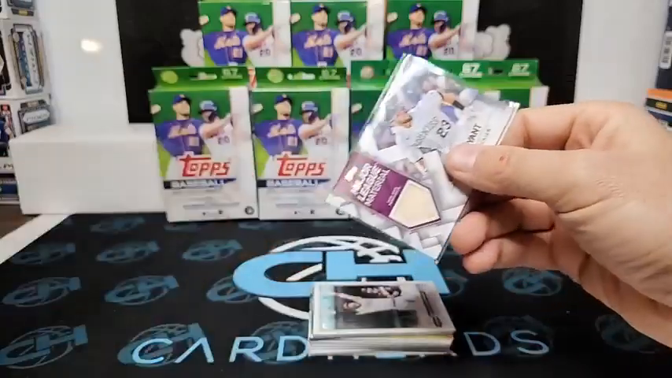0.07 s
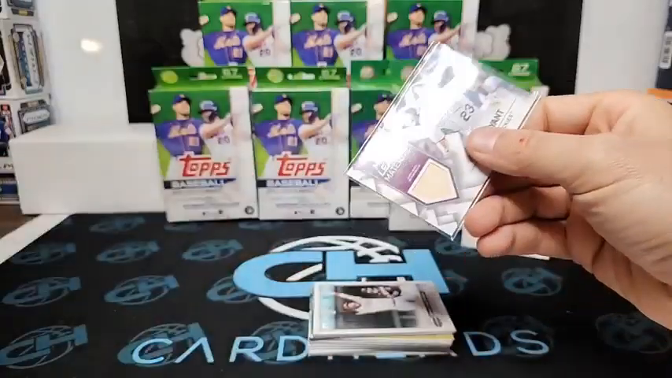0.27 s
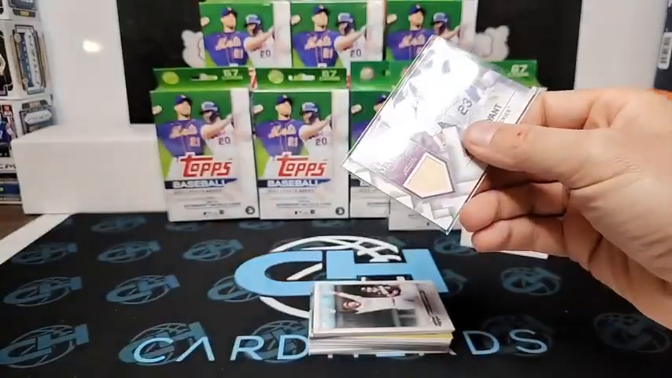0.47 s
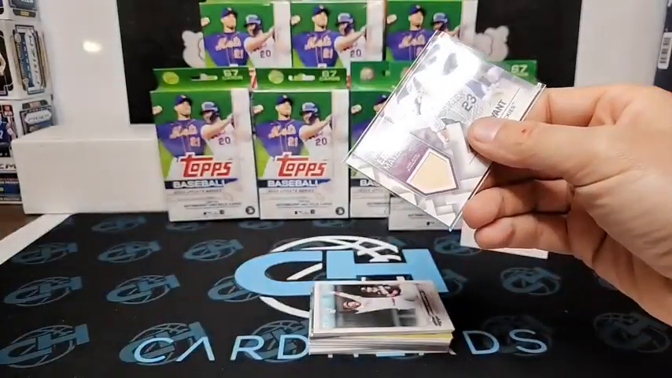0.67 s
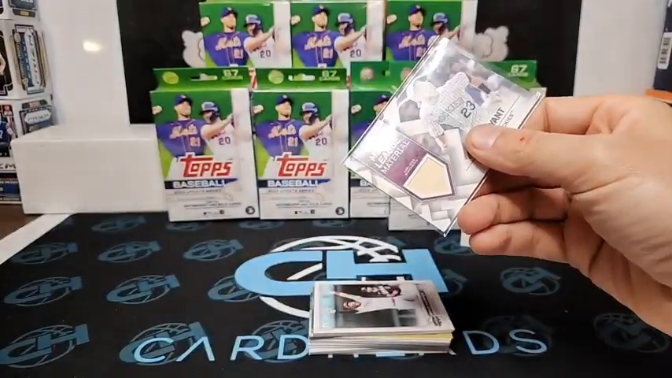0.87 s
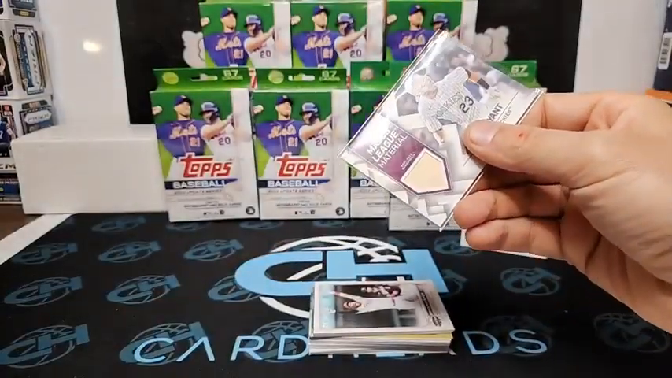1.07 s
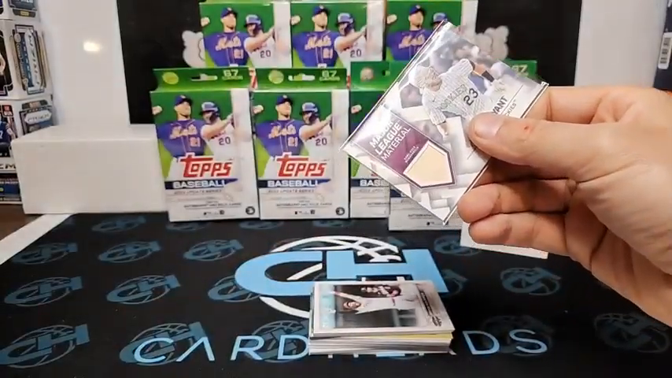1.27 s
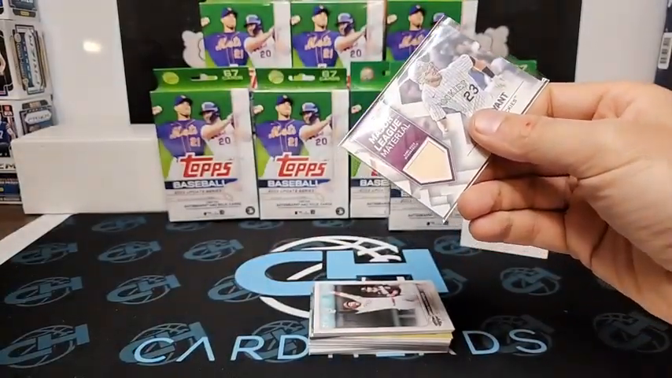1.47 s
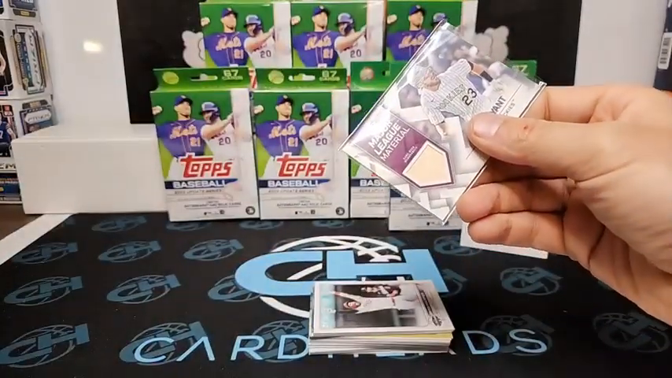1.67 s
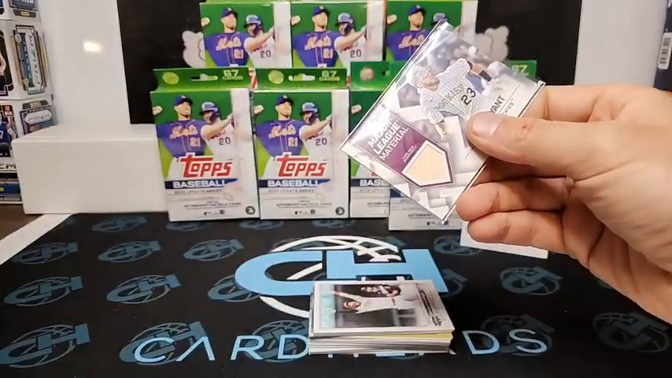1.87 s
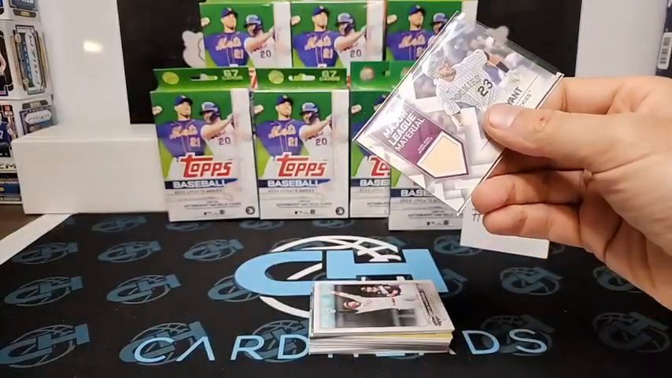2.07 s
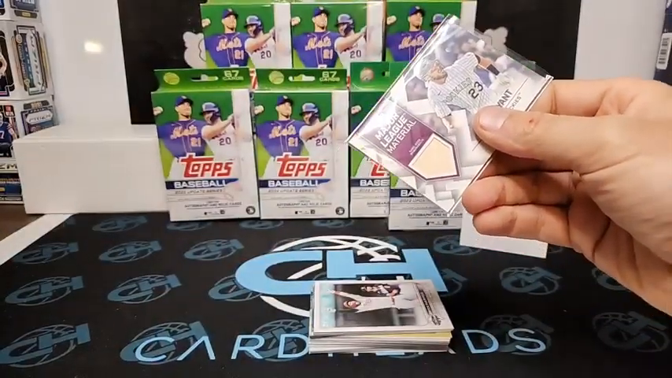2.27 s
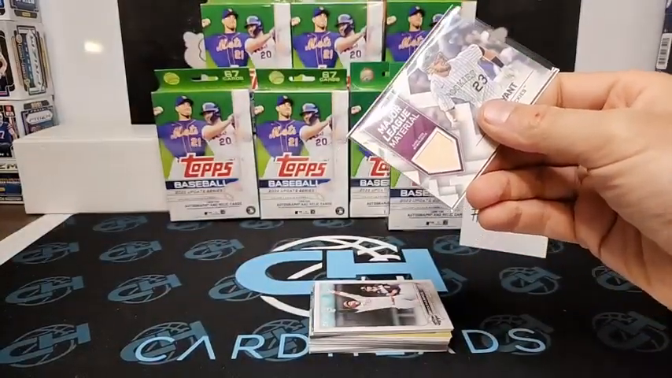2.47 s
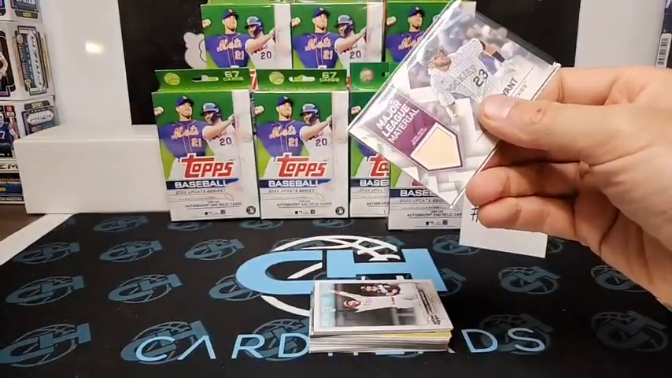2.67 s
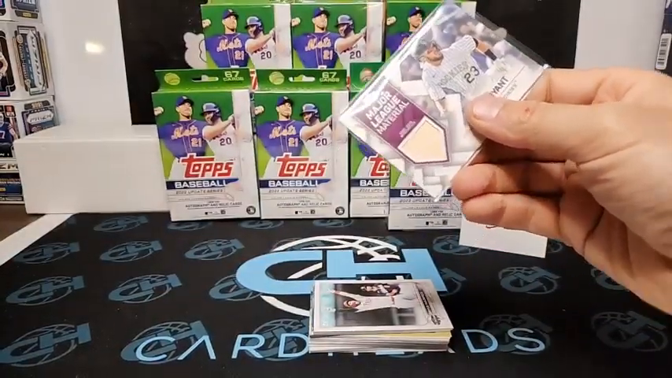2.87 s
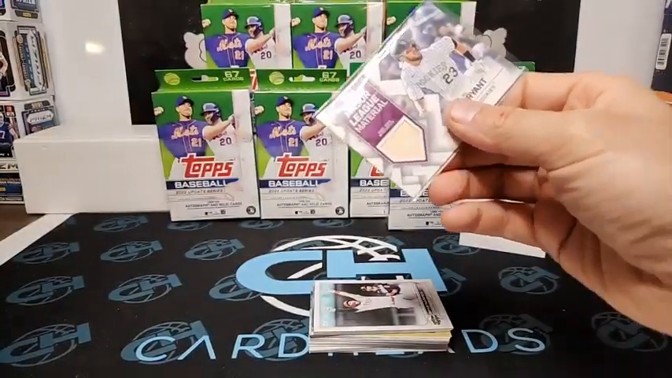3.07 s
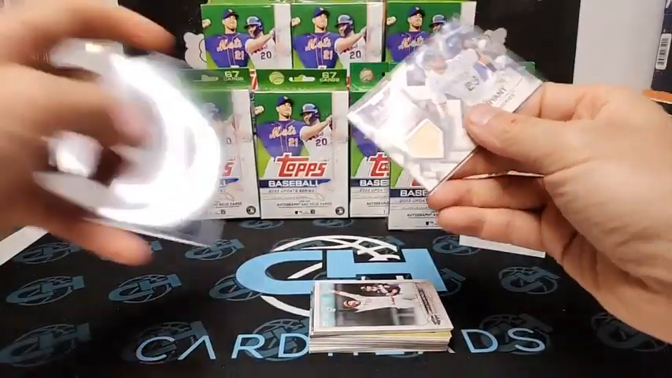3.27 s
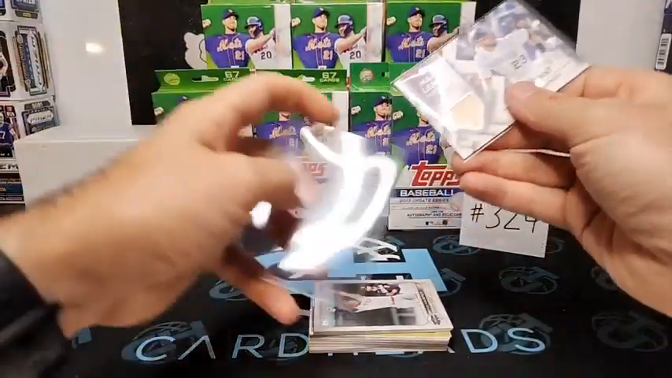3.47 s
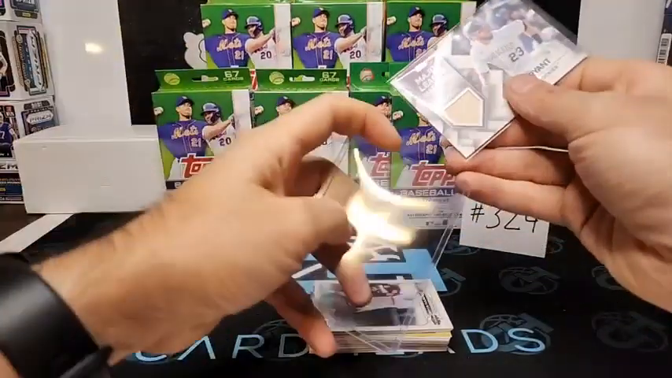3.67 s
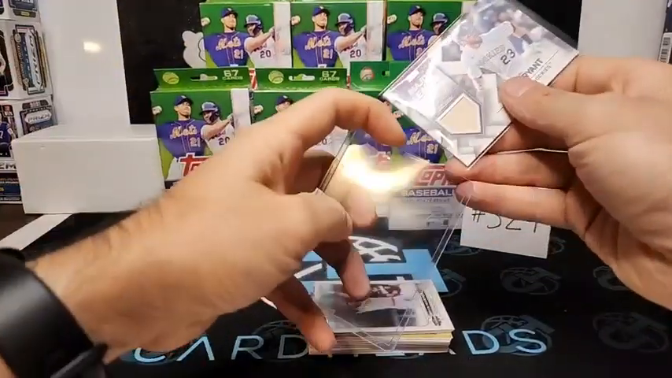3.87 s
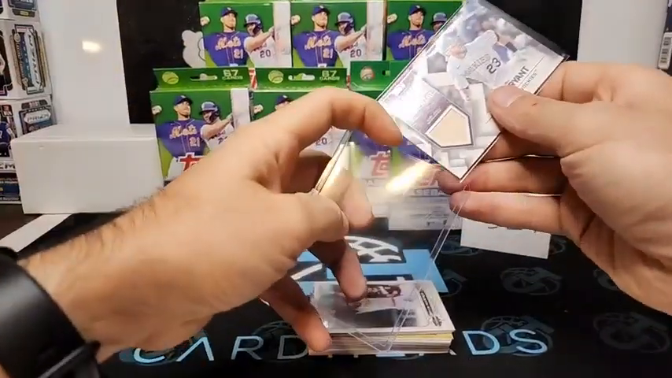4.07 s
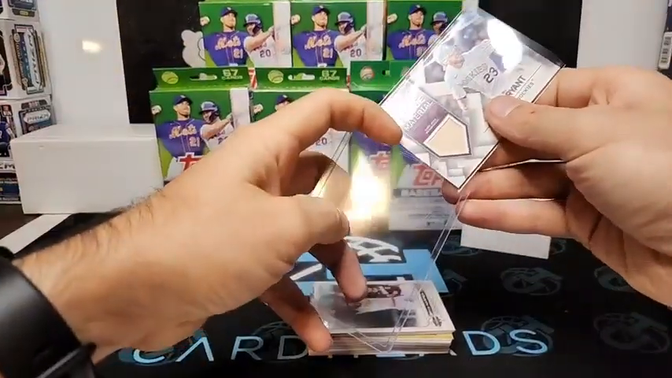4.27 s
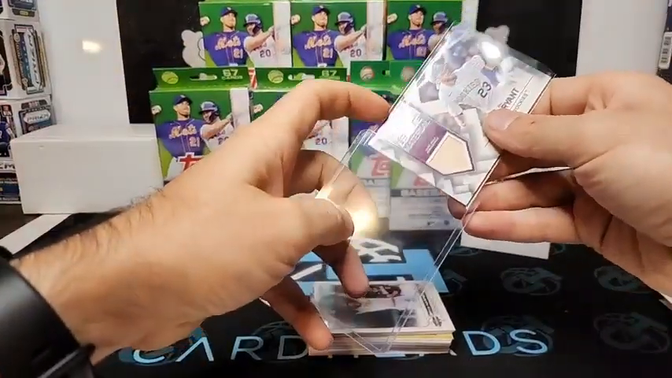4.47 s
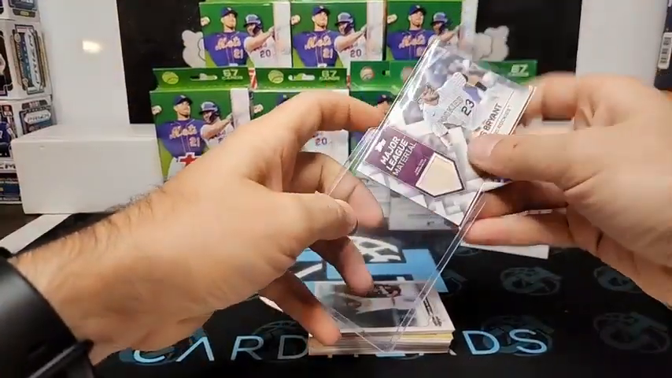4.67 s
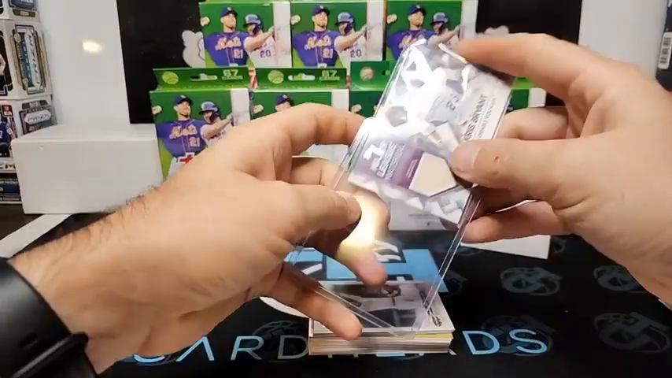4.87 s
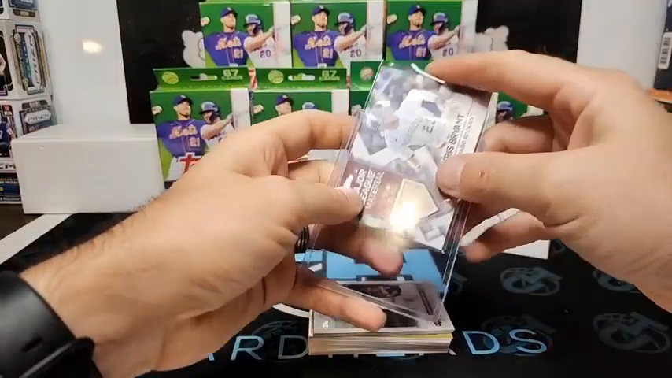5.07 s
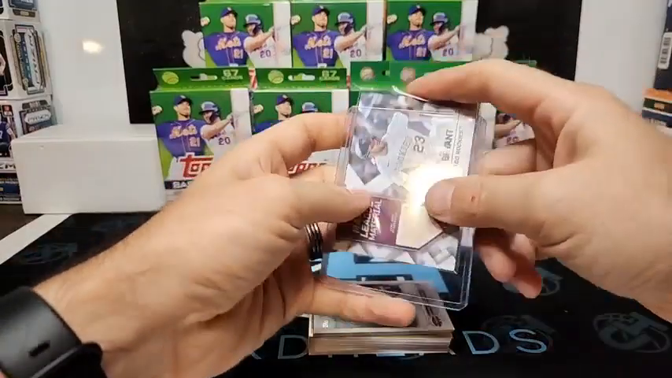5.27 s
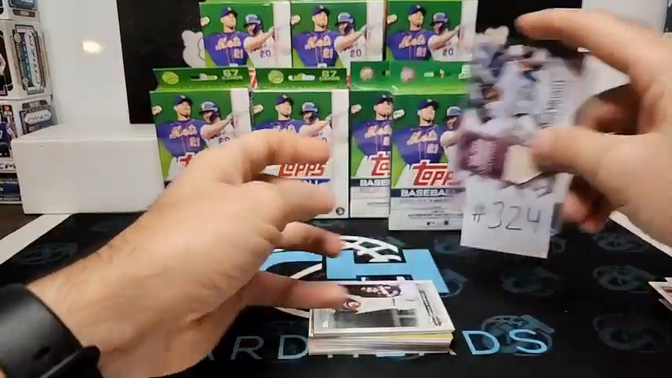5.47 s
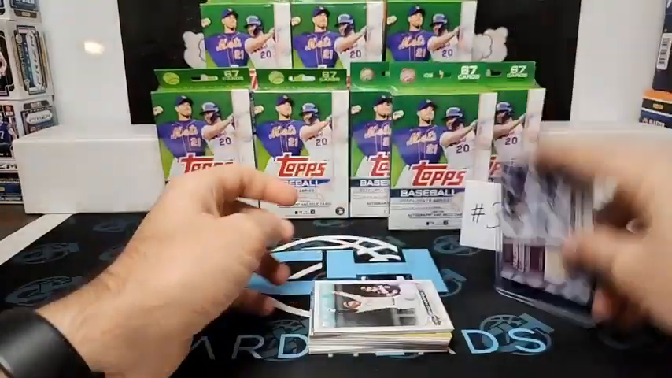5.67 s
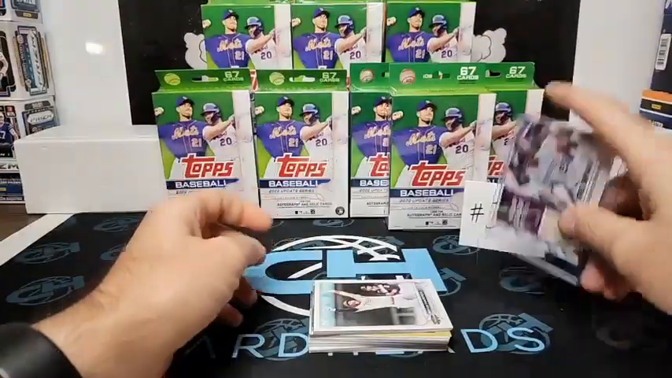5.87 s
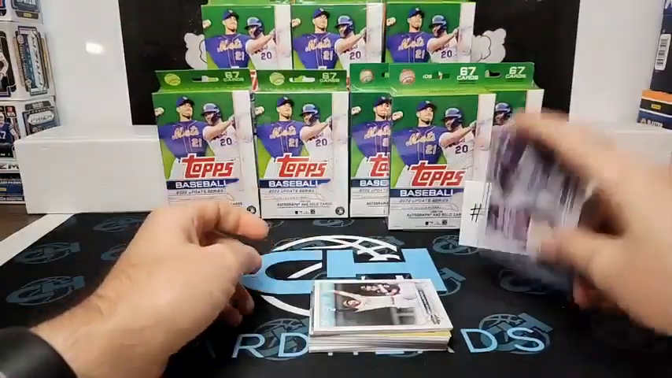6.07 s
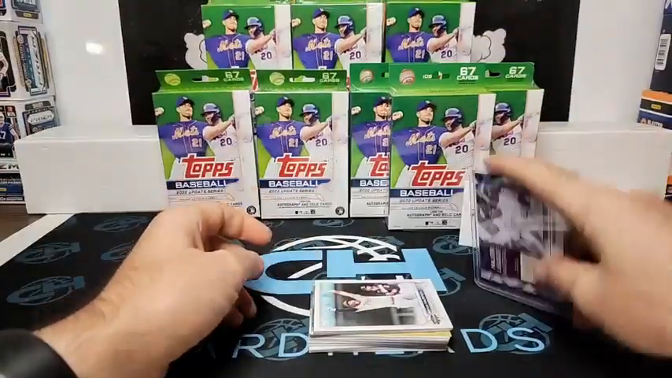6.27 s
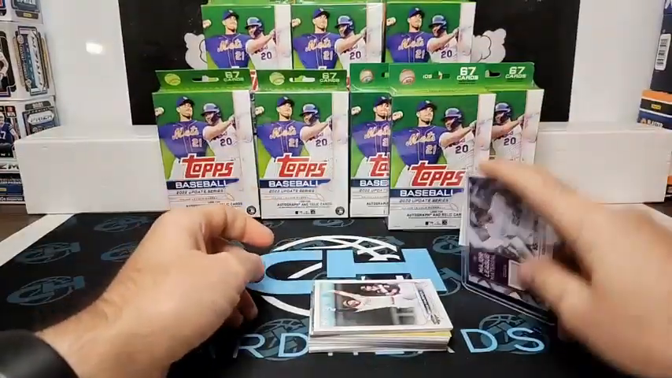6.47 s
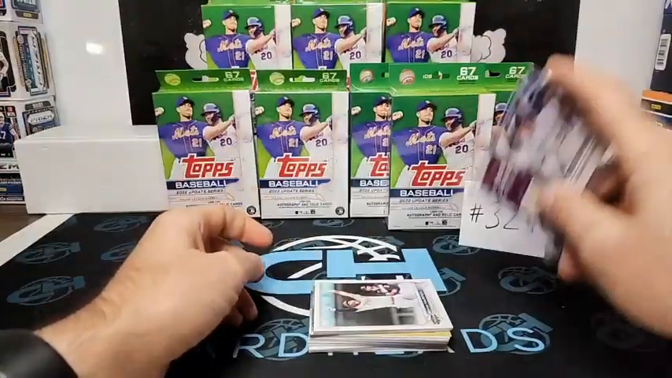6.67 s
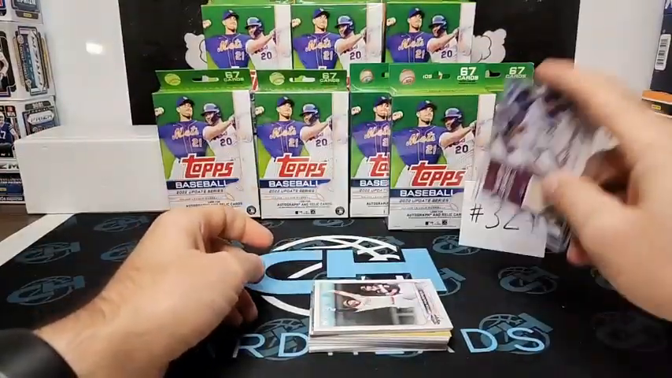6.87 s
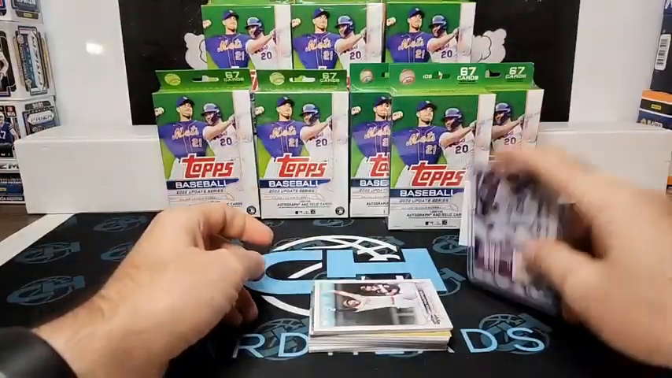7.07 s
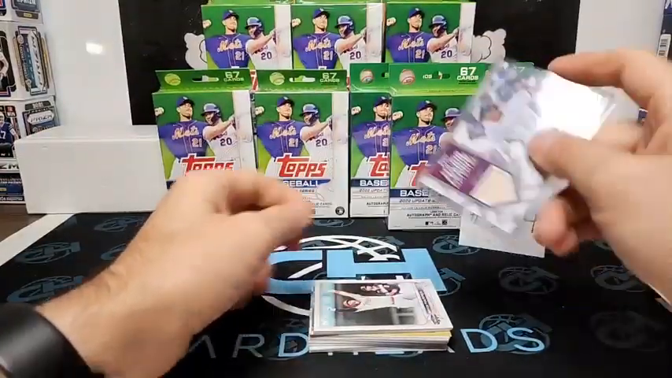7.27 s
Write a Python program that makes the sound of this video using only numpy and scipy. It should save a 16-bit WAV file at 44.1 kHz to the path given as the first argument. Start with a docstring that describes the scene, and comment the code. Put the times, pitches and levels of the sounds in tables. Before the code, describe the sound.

In a small room, a drawer slides open with a low rumble and a few hollow bumps. Close to the microphone, a rigid plastic card holder ticks and crackles as it is pinched open, and a sleeved card slides in with a soft scrape and faint squeaks. The holder's edge is then tapped six times on a desk, much louder, shaking the things on it. A faint appliance hum lies underneath.

```python
"""A mat-covered desk in a small room. A drawer slides open, slips on its runners shaking the box, and
a rigid plastic card holder is drawn out. The holder crackles as it is pinched open; a sleeved card
catches on its lip and slides in with a faint stick-slip squeak. The holder's edge is then tapped six
times to settle the card: the desk rings, things on it shake, the card clicks inside.
Faint room air and an appliance hum lie underneath."""
import sys
import numpy as np
from scipy import signal
from scipy.fft import rfft, irfft
from scipy.io import wavfile
from scipy.ndimage import uniform_filter1d

SR = 44100
rng = np.random.default_rng(int(sys.argv[2]) if len(sys.argv) > 2 else 0)


def store_wav(level_fs):
    """Save 16-bit WAV to argv[1]."""
    pcm = np.round(np.clip(np.atleast_2d(level_fs), -1, 1) * 32767)
    wavfile.write(sys.argv[1], SR, pcm.T.astype(np.int16))


N = 322792
TIME = np.arange(N) / SR

# holder edge on the desk: (time [s], level [dB], contact cutoff [Hz], weight [dB], loose things [dB],
# card click [dB], click tilt [dB/oct], card settling [dB])
TAPS = [(5.5807, -10, 925, -5.5, 6.5, -18.5, 6.5, -62), (5.8591, -2.5, 1180, -3.5, -1.5, -15, 1, -63.5),
        (6.1027, -2, 2080, 1, -2.5, -19.5, -1, -60.5), (6.3705, -1.5, 2300, 1.5, -3.5, -20.5, -0.5, -70),
        (6.628, 0.5, 3070, 1, 1.5, -13.5, -2, -50.5), (6.8627, 1.5, 3800, 0.5, -1.5, -18.5, 0, -57)]
# spectrum of the holder's plastic: (frequency [Hz], level [dB])
PLASTIC = [(200, -3.5), (600, -4.5), (850, -10.5), (1150, -4), (1550, -9.5), (1950, -2.5), (2350, -5.5),
           (3300, 0), (4500, -0.5), (6500, -12.5), (7700, -8), (9500, -15), (12300, -5), (14000, -22)]


def taps(bass_hz=200, vary_db=2.6, detune=0.0044, shake_db=-31, shake_t60_s=0.54,
         clatter_db=-27, clatter_t60_s=0.11, boom_db=-37, boom_t60_s=1.04):
    """The edge knocks, the desk rings, things on it shake; a lighter blow carries less bass."""
    # struck modes: (frequency [Hz], level [dB], t60 [s])
    edge_modes = [(469, -5, 0.016), (896.5, -17.5, 0.064), (1089, -19, 0.037), (1527, -14, 0.015),
                  (1840, -26, .03), (3100, -28.5, 0.016)]
    desk_modes = [(109, -16.5, 0.084), (137, -19, 0.08), (181, -25.5, 0.23), (249, -26.5, 0.036),
                  (284, -16, 0.037), (339.6, -22, 0.11), (371, -21, 0.11), (421.3, -28, 0.34),
                  (463.4, -17.5, 0.071), (598, -25, 0.039), (654, -10.5, 0.025), (720, -29, 0.03),
                  (765, -21.5, 0.071), (862, -22.5, 0.047), (883, -19.5, 0.023), (951, -13.5, 0.042),
                  (1027, -42.5, 0.481), (1124.4, -26.5, 0.069), (1249, -26, 0.073), (1386, -30, 0.13),
                  (1554, -30.5, 0.12), (1790, -51.5, 0.27)]
    # boxes and card stacks shaking: (frequency [Hz], level [dB])
    shake_spectrum = [(40, -24.5), (65, -9), (110, -4), (180, 5), (260, 1.5), (450, -10.5), (700, 3),
                      (1000, -15), (1500, -16), (2100, -20.5), (2800, -31.5), (6000, -48.5), (13000, -64)]
    # desk frame resonances: (frequency [Hz], width [Hz], level [dB])
    frame = [(70.4, 41, -12), (128.1, 30, -2.5), (181.9, 11, 5.5), (290, 47, -14.5)]
    out, t = np.zeros(N), TIME[:SR]
    knock = sum(mode(*row) for row in edge_modes)
    shaking = from_db(shake_db) * decay(t, shake_t60_s) + from_db(clatter_db) * decay(t, clatter_t60_s)
    shaking *= 1 - np.exp(-t / 0.004)
    for s, db, contact_hz, weight_db, loose_db, *_ in TAPS:
        ring = 0
        for k, (hz, mode_db, t60_s) in enumerate(desk_modes):
            struck_hz = hz * (1 + detune * rng.standard_normal())
            struck_db = mode_db + weight_db * (hz < bass_hz) + vary_db * rng.standard_normal()
            ring += (-1) ** k * mode(struck_hz, struck_db, t60_s)
        jolts = shaking * grains(SR, per_s=4000, spread_db=1.5)
        shake = from_db(loose_db) * signal.fftconvolve(jolts, response(shake_spectrum))[:SR]
        boom = resonate(grains(SR, per_s=1800, spread_db=0.5), frame)
        boom *= from_db(boom_db + weight_db) * decay(t, boom_t60_s)
        blow = butter(ring - knock + shake + boom, contact_hz)
        add(out, s, from_db(db) * butter(blow, hz=48 * from_db(-weight_db), kind="high"))
    return out


def card_settling(bounce_s=0.0084, bounce_loss_db=11.5, slip_s=0.078, rise_s=0.018, t60_s=0.16):
    """At each tap the card clicks against the holder, bounces once and slips deeper."""
    out, colour = np.zeros(N), response(PLASTIC, tilt_db_oct=3.5)
    for s, *_, click_db, tilt_db_oct, settle_db in TAPS:
        add(out, s, tick(click_db, tilt_db_oct))
        add(out, s + bounce_s, tick(click_db - bounce_loss_db, tilt_db_oct))
        add(out, s + slip_s - 2 * rise_s, stroke(settle_db, rise_s, t60_s, colour, per_s=9000))
    return out


def drawer_slide(start_s=0.622, coast_s=1.34, attack_s=0.028, coast_db_per_s=85,
                 rumble_db=-39, growth_db_per_s=5, scrape_db=-43.5,
                 catch_s=0.79, catch_half_s=0.066, catch_db=-16,
                 judder_s=0.68, judder_db=-37, fade_db_per_s=45, roll_db=-61.5, end_s=1.83, stop_s=0.035):
    """Slips on the runners shake the box: it shudders loose, sticks briefly, runs, then coasts."""
    # drawer resonances: (frequency [Hz], width [Hz], level [dB])
    box = [(96, 12, -10), (130.4, 10.8, 2), (193, 88, -13), (235, 9.1, 0.5), (272, 10.5, 2.5),
           (295, 13, -1), (318, 26, -6.5)]
    runners = [(448, 46, 0), (517, 16, 8), (581, 21.6, 5.5), (712, 43, 1), (776, 22.5, 2), (870, 75, -5.5),
               (1018, 54, -3), (1160, 216, -14), (1840, 480, -23.5), (4200, 2900, -40.5)]
    rumble = steady(butter(resonate(grains(N, per_s=900), box), hz=530))
    rumble *= from_db(rumble_db + growth_db_per_s * (TIME - start_s))
    judder = resonate(grains(N, per_s=250, spread_db=1.5), [(70, 35, 0)])   # 70 Hz, 35 Hz wide
    judder = steady(butter(judder, hz=120))
    judder *= from_db(roll_db) + from_db(judder_db - fade_db_per_s * (TIME - judder_s))
    scrape = butter(resonate(grains(N, per_s=6000, spread_db=0.1), runners), hz=5000)
    scrape *= from_db(scrape_db + catch_db * np.exp(-((TIME - catch_s) / catch_half_s) ** 2))
    pull = onset(start_s, attack_s) * from_db(-coast_db_per_s * np.maximum(TIME - coast_s, 0))
    moving = onset(judder_s - attack_s, attack_s) - onset(end_s - stop_s, stop_s)
    return pull * (rumble + scrape) + moving * judder


def drawer_bumps(bump_t60_s=0.47, shift_s=1.599):
    """The box bumps hollowly; loose holders shift as it stops."""
    # bumps of the box: (time [s], level [dB], rise [s])
    bumps = [(0.46, -63, 0.028), (0.64, -40, 0.0057), (0.68, -34.5, .025), (1.037, -37, 0.015),
             (1.462, -57, 0.006), (1.6, -42, 0.003), (1.74, -50.5, 0.0048), (1.869, -56.5, 0.017)]
    # spectra of a bump and of the shifting holders: (frequency [Hz], level [dB])
    bump_spectrum = [(71, -34), (120, -6), (302, -0.5), (405, -10), (483, -12.5), (743, -8), (1450, -25),
                     (1660, -20.5), (2230, -31.5), (5170, -42), (5930, -54), (13000, -68.5)]
    shift_spectrum = [(200, -24), (600, 1), (1000, 7.5), (1500, -12), (2200, -11.5), (4000, -21.5),
                      (7000, -39), (13000, -34)]
    out = np.zeros(N)
    for s, db, rise_s in bumps:
        add(out, s - 2 * rise_s, stroke(db, rise_s, bump_t60_s, response(bump_spectrum), per_s=3000))
    shift = stroke(db=-46.5, rise_s=0.0049, t60_s=0.42, colour=response(shift_spectrum), per_s=2900)
    add(out, shift_s, shift)
    return out


def tick(db, tilt_db_oct, rattle_db=-16, usual_t60_s=0.024, usual_db=-25, stretch_per_db=0.1615):
    """One snap, then a brief rattle of the plastic sheets; hard snaps rattle longer."""
    t = TIME[:SR // 10]
    t60_s = usual_t60_s * np.exp(stretch_per_db * (db - usual_db))
    snap = from_db(rattle_db) * decay(t, t60_s) * rng.standard_normal(len(t))
    snap[0] = 1
    return from_db(db) * signal.fftconvolve(snap, response(PLASTIC, tilt_db_oct))


def crackles(jitter_s=0.0014, vary_db=2, run_tilt_db_oct=1.0, vary_db_oct=1.5):
    """The holder ticks when handled and slips in uneven runs when pinched open."""
    # single ticks: (time [s], level [dB], tilt [dB/oct])
    singles = [(2.8682, -32.5, -8), (3.636, -26.5, 1), (3.756, -29, 1.5), (3.8301, -29, 1),
               (3.844, -34, -0.5), (4.202, -23.5, 0.5), (4.3461, -35, -5), (4.7190, -20, 8), (5.28, -27, 5)]
    # runs of slips: (start [s], length [s], gap [s], level [dB])
    runs = [(3.383, 0.015, 0.0065, -33), (3.411, 0.045, 0.012, -31), (3.4976, 0.064, 0.0114, -27)]
    out = np.zeros(N)
    for s, db, tilt_db_oct in singles:
        add(out, s, tick(db, tilt_db_oct))
    for start_s, length_s, gap_s, db in runs:
        times_s = np.arange(start_s, start_s + length_s, gap_s)
        for s, (late, harder, duller) in zip(times_s, rng.standard_normal((16, 3))):
            slip = tick(db + vary_db * harder, run_tilt_db_oct - vary_db_oct * duller)
            add(out, s + jitter_s * late, slip)
    return out


def flexes(band_hz=(190, 1500)):
    """The knocked holder bends like a plate, too small to radiate bass."""
    # bending modes: (time [s], frequency [Hz], level [dB], t60 [s])
    bends = [(4.2021, 301, -29, 0.052), (4.202, 620, -44, 0.053), (5.5807, 342, -17, 0.1),
             (5.8591, 369.4, -10, 0.093)]
    out = np.zeros(N)
    for s, hz, db, t60_s in bends:
        add(out, s, -mode(hz, db, t60_s))
    return butter(out, band_hz, "band")


def rubbing(sheet_hz=4070, width_hz=520, wander_oct=0.18, sheet_db=-14.5, grip_db=1.0,
            attack_s=0.019, release_t60_s=0.1, scuff_rise_s=0.0065):
    """Handling scuffs and the hiss of the card going in; the sheet's ring shifts with the grip."""
    # sliding friction: (frequency [Hz], level [dB])
    slide_spectrum = [(300, -2), (1000, -18.5), (1700, -8), (2600, -10.5), (3400, -9), (4700, -6.5),
                      (6400, -10), (7900, -5), (9400, -8), (11500, 1), (13200, 1.5)]
    # pushes on the card: (start [s], length [s], level [dB], fade [dB/s])
    pushes = [(2.923, 0.28, -68, 28), (4.074, 0.33, -72, 0), (4.337, 0.098, -51.5, 110),
              (4.438, 0.086, -54, 70), (4.531, 0.079, -51.5, 36), (4.725, 0.3, -53, 48),
              (5.035, 0.13, -62.5, -23), (5.207, 0.11, -61, -3), (5.404, 0.047, -69.5, 30),
              (7.022, 0.27, -73.5, -10.5)]
    # plastic brushing plastic or skin: (time [s], level [dB], t60 [s], tilt [dB/oct])
    scuffs = [(0.644, -54.5, 0.48, -0.5), (1.492, -70, 0.33, 3.5), (1.743, -60, 0.69, -3),
              (1.854, -52.5, 0.28, -1.5), (1.876, -43, 0.081, 4), (2.875, -59, 0.46, -3),
              (3.209, -57, 0.097, 2), (3.368, -56, 0.37, 0.5), (3.425, -51, 0.13, 0.5),
              (3.573, -49, 0.038, 0.5), (3.682, -63, 0.1, 0), (3.786, -64.5, 0.31, -1.5),
              (4.722, -49, 0.068, 2), (5.277, -55, 0.18, 2), (5.308, -52, 0.064, 0.5),
              (5.686, -46, 0.18, 1.5), (6.639, -41, 0.12, -16)]
    hiss = signal.fftconvolve(grains(N, per_s=8000, spread_db=2.5), response(slide_spectrum))[:N]
    pitch_hz = sheet_hz * 2 ** (wander_oct * flutter(N, hz=11))
    ring = rms_one(flutter(N, width_hz / 2) * glide(pitch_hz))
    slide = (hiss + from_db(sheet_db) * ring) * from_db(grip_db * flutter(N, hz=25))
    out = np.zeros(N)
    for s, length_s, db, fade_db_per_s in pushes:
        push = onset(s, attack_s) * from_db(db - fade_db_per_s * np.clip(TIME - s, 0, length_s))
        release = decay(np.maximum(TIME - s - length_s, 0), release_t60_s)
        out += slide * push * release
    for s, db, t60_s, tilt_db_oct in scuffs:
        scuff = stroke(db, scuff_rise_s, t60_s, response(PLASTIC, tilt_db_oct), per_s=8200)
        add(out, s - 2 * scuff_rise_s, scuff)
    return out


def narrow_rings():
    """Brief narrow rings from small creaks, faint rubs, a soft knock and the holder's snap."""
    # rings: (time [s], frequency [Hz], width [Hz], level [dB], t60 [s])
    rings = [(0.117, 3240, 900, -63, 0.12), (0.435, 983, 248, -65, 0.3), (0.638, 5260, 1200, -50.5, 0.054),
             (2.036, 4260, 890, -66.5, 0.077), (3.111, 4170, 800, -76, 1), (3.22, 1914, 500, -75.5, 1),
             (4.7192, 7470, 815, -30, 0.015), (4.719, 1500, 830, -38.5, 0.019),
             (5.233, 965, 595, -56, 0.086), (5.305, 2600, 810, -48.5, 0.046), (7.189, 4640, 910, -75, 0.28)]
    out, size = np.zeros(N), SR // 2
    for s, hz, width_hz, db, t60_s in rings:
        add(out, s, np.sqrt(2) * flutter(size, width_hz / 2) * mode(hz, db, t60_s)[:size])
    return out


def squeaks(flutter_hz=290, rise_oct=0.64):
    """Each slip of the sleeve speeds up and slows; pitch and level of its breathy squeak follow."""
    # sleeve slips: (centre [s], length [s], top pitch [Hz], level [dB])
    slips = [(4.475, 0.05, 3610, -65), (4.773, 0.05, 5030, -71), (4.843, 0.039, 5600, -69),
             (4.906, 0.08, 5240, -64.5), (4.973, 0.06, 5220, -70), (5.047, 0.07, 3730, -86)]
    out, t = np.zeros(N), TIME[:SR // 5]
    for s, length_s, top_hz, db in slips:
        speed = np.sin(np.pi * np.minimum(t / length_s, 1))
        pitch_hz = top_hz * 2 ** (rise_oct * (speed - 1))
        squeak = np.sqrt(2) * flutter(len(t), flutter_hz) * glide(pitch_hz)
        add(out, s - length_s / 2, from_db(db) * speed * squeak)
    return out


def room(x, build_s=0.004):
    """Diffuse reflections build up, then die away; the bass lasts longest."""
    # reverberation time: (frequency [Hz], t60 [s])
    t60s = [(100, 1), (300, 0.88), (800, 0.42), (2000, 0.16), (5000, 0.51), (12000, 0.15)]
    # reverberation spectrum: (frequency [Hz], level [dB])
    levels = [(60, -13), (150, -16), (300, -9), (700, -14.5), (1500, -6.5), (3000, -10), (7000, -16.5),
              (12000, -8)]
    t, tail = TIME[:SR], 0
    build = 1 - np.exp(-(t / build_s) ** 2)
    edges_hz = np.geomspace(40, 16000, 14)
    for low, high in zip(edges_hz, edges_hz[1:]):
        hz = np.sqrt(low * high)
        band = butter(rng.standard_normal(SR) * build * decay(t, at_hz(t60s, hz)), [low, high], "band")
        gain = from_db(at_hz(levels, hz)) * np.sqrt(2 * (high - low) / SR)
        tail += gain * band / np.linalg.norm(band)
    return signal.fftconvolve(x, tail)[:N]


def background(air_db=-69.5, hum_db=-69.5, hum_hz=118, waver=0.35):
    """Faint room air and a wavering appliance hum."""
    # still room: (frequency [Hz], level [dB])
    air_spectrum = [(15, -57), (25, -39.5), (49, -4.5), (86, -27.5), (117, -3.5), (160, -25.5), (244, -10),
                    (593, -28), (641, -15.5), (731, -27.5), (1000, -28), (2310, -36), (3420, -41.5),
                    (5630, -45), (13000, -44.5)]
    air = signal.fftconvolve(rng.standard_normal(N), response(air_spectrum, size=8192))[:N]
    sway = 1 + waver * flutter(N, hz=6.2)
    hum = sway * np.sqrt(2) * np.sin(2 * np.pi * hum_hz * TIME)
    return from_db(air_db) * air + from_db(hum_db) * hum


def from_db(db):
    """Decibels to gain."""
    return 10 ** (np.asarray(db) / 20)


def decay(t, t60_s):
    """Gain falling 60 dB per t60_s."""
    return from_db(-60 * t / t60_s)


def onset(s, attack_s):
    """Ramp from 0 to 1, starting at time s."""
    return np.clip((TIME - s) / attack_s, 0, 1)


def rms_one(x):
    """Scale to unit rms."""
    return x / np.sqrt(np.mean(x ** 2) + 1e-20)


def steady(x):
    """Even out the slow level swings of a noise."""
    return x / np.sqrt(uniform_filter1d(x ** 2, size=SR // 12) + 1e-9)


def at_hz(points, hz):
    """Read a table on a log-frequency axis."""
    table = np.array(points)
    return np.interp(np.log(np.maximum(hz, 1)), np.log(table[:, 0]), table[:, 1])


def add(out, s, sound):
    """Mix a sound in at time s."""
    start = max(round(s * SR), 0)
    out[start:start + len(sound)] += sound[:N - start]


def butter(x, hz, kind="low", order=2):
    """Butterworth filter, low-pass by default."""
    return signal.sosfilt(signal.butter(order, hz, kind, fs=SR, output="sos"), x)


def flutter(size, hz):
    """Low-passed noise; rms 1."""
    return rms_one(butter(rng.standard_normal(size), hz))


def glide(pitch_hz):
    """Sine following a pitch curve."""
    return np.sin(2 * np.pi * np.cumsum(pitch_hz) / SR)


def response(spectrum, tilt_db_oct=0, size=2048):
    """Causal impulse response of unit energy with this spectrum, tilted above 2 kHz."""
    hz = np.maximum(np.fft.rfftfreq(size, 1 / SR), 10)
    db = at_hz(spectrum, hz) + tilt_db_oct * np.log2(np.maximum(hz, 2000))
    cepstrum = irfft(np.log(from_db(db)))
    cepstrum[size // 2:] = 0
    impulse = irfft(np.exp(rfft(2 * cepstrum)))
    return impulse / np.linalg.norm(impulse)


def grains(size, per_s, spread_db=0):
    """Friction: tiny slips of uneven size at random moments; rms 1."""
    slips = (rng.random(size) < per_s / SR) * rng.standard_normal(size)
    return rms_one(slips * from_db(spread_db * np.clip(rng.standard_normal(size), -2, 2)))


def resonate(x, resonances):
    """Parallel resonances with alternating signs; rms 1."""
    out = 0
    for k, (hz, width_hz, db) in enumerate(resonances):
        r = np.exp(-np.pi * width_hz / SR)
        feedback = [1, -2 * r * np.cos(2 * np.pi * hz / SR), r * r]
        out += (-1) ** k * from_db(db) * (1 - r * r) * signal.lfilter([1, 0, -1], feedback, x)
    return rms_one(out)


def mode(hz, db, t60_s):
    """One second of a struck mode."""
    t = TIME[:SR]
    return from_db(db) * decay(t, t60_s) * np.sin(2 * np.pi * hz * t)


def stroke(db, rise_s, t60_s, colour, per_s):
    """A short rub through the impulse response colour; peaks after two rise times."""
    t = TIME[:SR // 2] - 2 * rise_s
    shape = np.where(t < 0, np.exp(-(t / rise_s) ** 2), decay(np.abs(t), t60_s))
    return from_db(db) * signal.fftconvolve(shape * grains(len(t), per_s), colour)


def scene(side_db=-11, side_hz=5500, hands_send_db=-3, flex_send_db=-6):
    """Close, drier hands; the furniture fills the room; only the top treble spreads to the sides."""
    furniture = drawer_slide() + drawer_bumps() + taps()
    flex = flexes()
    hands = rubbing() + squeaks() + narrow_rings() + card_settling() + crackles()
    reverb = room(furniture + from_db(hands_send_db) * hands + from_db(flex_send_db) * flex)
    mid = furniture + hands + flex + reverb + background()
    treble = signal.sosfiltfilt(signal.butter(3, side_hz, "high", fs=SR, output="sos"), mid)
    side = from_db(side_db) * treble * flutter(N, hz=600)
    return np.array([mid + side, mid - side])


def record(dry, bass_cut_hz=42, top_cut_hz=13100):
    """The small microphone loses the deep bass; the top is cut steeply."""
    thin = butter(dry, bass_cut_hz, "high", order=3)
    return signal.sosfilt(signal.ellip(10, 0.2, 80, top_cut_hz, fs=SR, output="sos"), thin)


dry = scene()
out = record(dry)
store_wav(out)
```